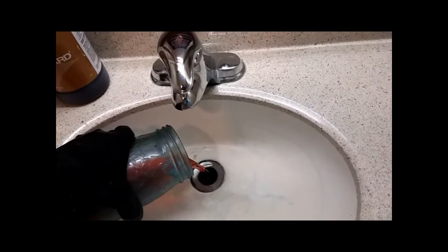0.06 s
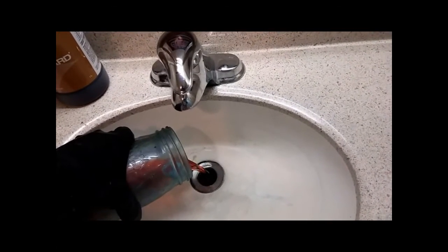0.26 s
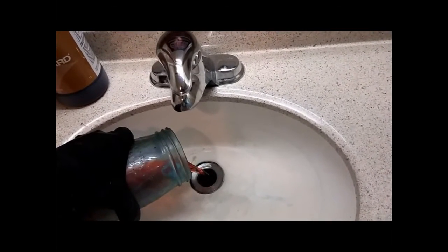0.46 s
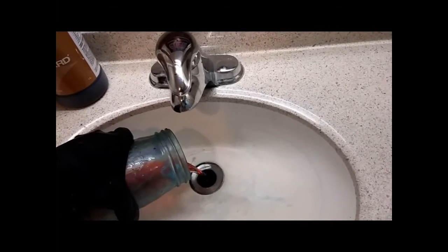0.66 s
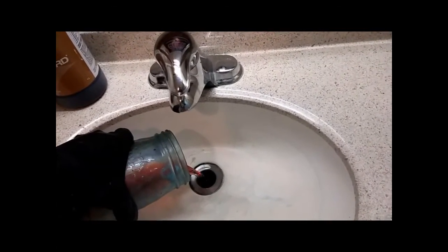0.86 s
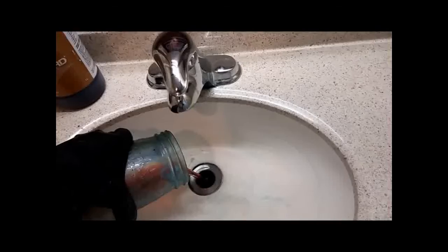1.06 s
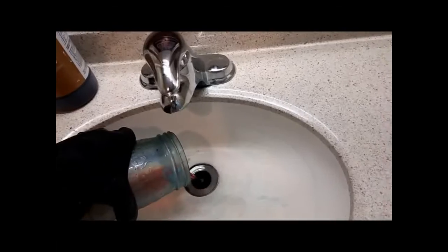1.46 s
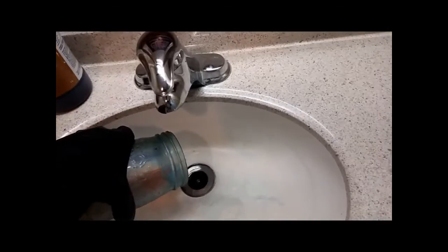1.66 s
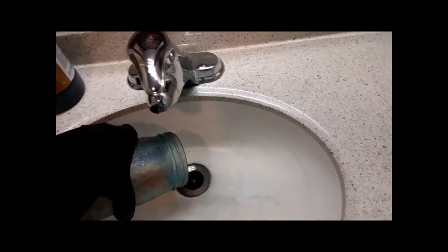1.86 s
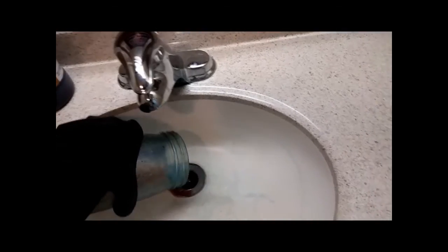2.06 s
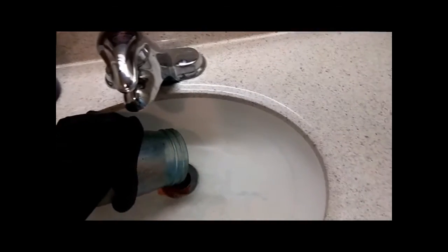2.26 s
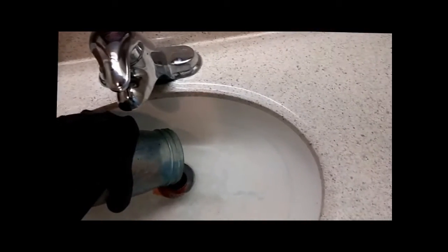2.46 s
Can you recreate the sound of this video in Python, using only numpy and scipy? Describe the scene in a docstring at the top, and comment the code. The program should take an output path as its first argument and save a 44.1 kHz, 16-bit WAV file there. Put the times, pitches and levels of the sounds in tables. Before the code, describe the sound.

Liquid poured from a jar splashes and glugs down a bathroom sink drain.

```python
"""Water splashes and glugs down a bathroom sink drain: a thin stream from a jar, in uneven surges.
Air pockets glug in the waste pipe, splashes ring the throat above the trap, small bubbles chirp
and spray ticks. Foam fizzes as the pour ends. Heard from just above, with reflections from the
basin and the small room, over a quiet hush."""
import sys
import numpy as np
from scipy import signal
from scipy.fft import rfft, irfft
from scipy.io import wavfile

SR = 44100
rng = np.random.default_rng(int(sys.argv[2]) if len(sys.argv) > 2 else 0)


def unload_audio(sound):
    """Save the sound as a 16-bit wav file, at the path given as the first command line argument."""
    columns = np.transpose(np.atleast_2d(sound))
    # keep every value between -1 and 1, then stretch to whole-number steps
    steps = np.round(np.clip(columns, -1, 1) * 32767)
    wavfile.write(sys.argv[1], SR, steps.astype(np.int16))


N = 114660

# surges of the stream: start_s, length_s, rumble_db, throat_db, bubble_db, spray_db, bubble_hz
STREAM_SURGES = [(0.189, 0.047, -39.5, -44.5, -46, -48.5, 2470), (0.254, 0.058, -48, -57.5, -48, -54, 2620),
                 (0.443, 0.12, -39.5, -43.5, -37.5, -44, 2530), (0.571, 0.12, -61, -55, -49.5, -53.5, 2575),
                 (0.7, 0.096, -37.5, -37.5, -37, -41, 2755), (0.803, 0.16, -35, -39, -39.5, -43, 2477),
                 (.96, 0.093, -41, -42.5, -37, -48.5, 2510), (1.062, 0.024, -63, -50.5, -44, -47.5, 2310),
                 (1.198, 0.08, -77, -54, -68, -48, 2310), (1.367, 0.055, -48, -55, -49, -45.5, 2880),
                 (1.434, 0.041, -40.5, -42.5, -33.5, -40, 2850), (1.548, 0.12, -39, -40, -39, -40.5, 2954),
                 (1.665, 0.044, -43.5, -46.5, -42, -46.5, 2870), (1.932, 0.04, -76, -53, -55, -54, 2860),
                 (1.989, 0.053, -42.5, -48, -36.5, -46.5, 3105)]
# single drops landing: start_s, bubble_db, bubble_hz, throat_db, spray_db
SINGLE_DROPS = [(0.0593, -64, 2480, -39, -44), (0.1767, -33.5, 2240, -34, -47),
                (0.2029, -36, 2160, -31, -59), (0.2327, -26, 2440, -54, -33),
                (0.2744, -42, 2370, -36, -39.5), (0.4461, -27.5, 2620, -62, -54),
                (0.4697, -27, 2560, -44, -56), (0.484, -28, 2300, -33, -54),
                (0.5299, -26, 2600, -31, -34.5), (0.5524, -54, 2350, -26.5, -40),
                (0.6245, -50, 2580, -49, -37.5), (0.7014, -30, 2220, -29.5, -48),
                (0.7357, -22.5, 2672, -35, -49), (0.7677, -31, 2510, -20.5, -50),
                (0.8345, -45, 2230, -37, -35), (0.857, -35.5, 2330, -34, -56),
                (0.8844, -36, 3100, -36, -34), (0.9203, -20, 2346, -17, -52),
                (0.9374, -26.5, 2230, -34, -61), (0.9837, -34, 2400, -29.5, -41),
                (1.0129, -21.5, 2433, -52, -55), (1.0365, -34, 2600, -26, -36),
                (1.0734, -54, 2300, -60, -47), (1.2002, -69, 2900, -58, -40), (1.2234, -50, 2780, -47, -53),
                (1.373, -44, 2970, -68, -34.5), (1.3922, -43, 2410, -31, -52),
                (1.4394, -28, 2980, -25, -29), (1.4825, -33, 2960, -26.5, -39),
                (1.509, -39, 2830, -31, -32), (1.5475, -23, 2800, -26.5, -36),
                (1.5761, -24, 2846, -46, -30.5), (1.598, -26, 2800, -27.5, -44),
                (1.6149, -22, 3000, -26, -23.5), (1.6536, -39, 2620, -60, -34),
                (1.7214, -50, 3040, -61, -35.5), (1.7484, -45, 2970, -39.5, -48),
                (1.947, -41, 2890, -35.5, -62), (2.002, -36, 2870, -42, -39),
                (2.0463, -40, 2880, -26.5, -38), (2.2814, -54, 2630, -66, -42)]

BUBBLE_RISE, SIZE_SPREAD_DB, DROP_ATTACK_S = 0.058, 2.5, 0.001186
SPRAY_PER_S, SPRAY_SPREAD_DB = 1500, 1.5
WIDE_ABOVE_HZ = 498


def stream():
    """Gains of rumble, throat ring and spray over time; the surges add in power."""
    attack_s, release_s = 0.0046, 0.0066
    power = np.zeros((3, N))
    for start_s, length_s, rumble_db, throat_db, _, spray_db, _ in STREAM_SURGES:
        t = np.arange(N) / SR - start_s
        envelope = np.clip(t / attack_s, 0, 1) * np.exp(-np.maximum(t - length_s, 0) / release_s)
        power += np.outer(undb([rumble_db, throat_db, spray_db]), envelope) ** 2
    return np.sqrt(power)


def pipe(drive):
    """Stream and draining water shake the waste pipe's air column; big air pockets glug into it."""
    # air column modes: pitch_hz
    modes_hz = [84, 120, 164, 221, 251, 200, 290, 326, 350, 398, 465]
    # ring of each mode: t60_s, level_db
    mode_rings = [(0.32, -16.5), (0.26, -7.5), (0.2, 0), (0.26, -6), (0.1, -5.5), (.04, 3.5),
                  (0.018, -17.5), (0.089, -4.5), (0.053, -3.5), (0.54, -11.5), (0.15, -12.5)]
    # air pockets: start_s, level_db, pitch_hz
    pockets = [(0.208, -43, 190), (0.238, -35, 275), (0.337, -34.5, 208), (0.375, -39, 338),
               (0.445, -32.5, 230), (.468, -32, 283), (0.487, -27.5, 181), (.517, -29.5, 226),
               (0.584, -35, 218), (0.702, -27, 320), (0.726, -27, 290), (0.756, -28, 303),
               (.781, -26.5, 270), (.815, -37, 245), (0.854, -20.5, 212), (0.918, -20.5, 191),
               (0.983, -29.5, 152), (1.008, -30.5, 232), (1.39, -40, 298), (1.447, -34, 172),
               (1.466, -37.5, 129), (1.554, -25.5, 162), (1.624, -26.5, 208), (1.651, -27.5, 199),
               (1.693, -48, 210), (2.009, -28.5, 189), (2.235, -39.5, 160), (2.323, -35, 165),
               (2.391, -62, 167), (2.484, -38.5, 168), (2.562, -41, 165)]
    drain_db, resonance_db = -46.5, -1
    column = ring([(hz, t60_s, db) for hz, (t60_s, db) in zip(modes_hz, mode_rings)])
    glugs = np.zeros(N)
    for start_s, db, hz in pockets:
        add(glugs, start_s, undb(db + 9.5) * bubble(hz, cycles=9.45, rise=0.093))
    impacts = patter(per_s=420, spread_db=1.65) * (drive + undb(drain_db))
    rumble = lowpass(through(impacts, column), hz=421, order=5)
    return rumble + glugs + undb(resonance_db) * through(glugs, unit_peak_gain(column))


def throat(drive):
    """Splashes, a trickle and single drops ring the short tube above the trap."""
    # tube modes: pitch_hz, t60_s, level_db
    modes = [(691, 0.1, -8), (700, 0.019, -30), (749, 0.041, 4), (776, 0.092, -12.5), (970, 0.0089, -11),
             (1365.6, 0.069, 1.5), (1364, 0.027, -4), (1680, 0.055, -9), (1775, 0.043, -17),
             (2235, 0.016, 9)]
    # trickle: time_s, level_db
    trickle = [(0, -62), (.35, -57.5), (.42, -58), (.65, -48), (1.15, -57.5), (1.75, -53.5), (1.87, -67.5),
               (2.14, -62.5), (2.25, -65), (2.6, -72)]
    tube = unit_energy(highpass(lowpass(ring(modes), hz=2100), hz=527, order=4))
    blows = np.zeros(N)
    for start_s, _, _, db, _ in SINGLE_DROPS:
        add(blows, start_s + DROP_ATTACK_S, np.array([undb(db - 2) / np.abs(tube).max()]))
    splashes = patter(per_s=260, spread_db=SIZE_SPREAD_DB) * np.hypot(drive, curve(trickle))
    return through(blows + splashes, tube)


def bubbles():
    """Each surge traps a swarm of small bubbles, each drop one; they chirp in the drain's mouth."""
    # cross modes of the mouth: pitch_hz, t60_s, level_db
    modes = [(2194, 0.16, -2), (2311, 0.076, 8), (2340, 0.096, -7), (2509, 0.057, 1.5), (2750, 0.076, 3),
             (2910, 0.12, -5), (3003, 0.18, -10)]
    per_s, cycles, pitch_scatter = 220, 50, 0.128
    direct_db, mouth_db = -9.5, 5
    chirps = np.zeros((2, N))
    for start_s, length_s, _, _, db, _, hz in STREAM_SURGES:
        swarm = np.zeros((2, N))
        for when, pitch, size, life, side in rng.random((128, 5))[:int(per_s * length_s) + 1]:
            pitch_hz = hz * np.exp(pitch_scatter * (2 * pitch - 1))
            chirp = bubble(pitch_hz, cycles * (0.5 + life), BUBBLE_RISE)
            gain = undb(-SIZE_SPREAD_DB * np.log(1 - size))
            add(swarm, start_s + when * length_s, pan(gain * chirp, 2 * side - 1))
        chirps += undb(db) * swarm * np.sqrt(2 * length_s * SR / np.sum(swarm ** 2))
    for start_s, db, hz, _, _ in SINGLE_DROPS:
        add(chirps, start_s, undb(db + 8) * bubble(hz, cycles, BUBBLE_RISE))
    mouth = unit_peak_gain(ring(modes))
    return np.array([undb(direct_db) * x + undb(mouth_db) * through(x, mouth) for x in chirps])


def plinks():
    """Lone bubbles ring on, rising slightly in pitch."""
    # bubbles: start_s, level_db, pitch_hz, cycles
    lone_bubbles = [(.007, -43.5, 1580, 140), (.903, -26, 792, 55), (.922, -25, 3670, 74),
                    (1.215, -48, 1717, 260), (1.262, -38, 2240, 140), (2.125, -43.5, 773, 140),
                    (2.236, -45.5, 760, 48), (2.455, -48, 770, 59)]
    out = np.zeros(N)
    for start_s, db, hz, cycles in lone_bubbles:
        add(out, start_s, undb(db) * bubble(hz, cycles, rise=0.07))
    return out


def spray(drive):
    """Fine droplets spatter on the drain; each drop throws a short burst of them."""
    # spatter between surges: time_s, level_db
    spatter = [(0, -64.5), (.33, -59), (.41, -58.5), (.65, -51), (1.05, -58), (1.12, -63), (1.18, -58.5),
               (1.33, -53), (1.75, -54), (1.86, -65.5), (2.1, -59), (2.6, -64)]
    # tick spectrum: freq_hz, level_db
    spectrum = [(900, -19.5), (1900, -13.5), (2600, 1), (3200, -3), (3550, -9), (3900, -1.5), (4500, -1.5),
                (5050, 3.5), (5850, -0.5), (6700, -13), (9500, -9.5), (12500, -14.5)]
    burst_decay_s = 0.0036
    shower = undb(-4) * droplets() + undb(-8) * patter(SPRAY_PER_S, SPRAY_SPREAD_DB)
    ticks = shower * np.hypot(drive, curve(spatter))
    t = np.arange(SR // 40) / SR
    burst = (1 - np.exp(-t / DROP_ATTACK_S)) * np.exp(-t / burst_decay_s)
    for start_s, _, _, _, db in SINGLE_DROPS:
        add(ticks, start_s, undb(db + 4) * burst * rng.standard_normal((2, len(t))))
    return np.array([through(x, unit_energy(colour(spectrum))) for x in ticks])


def droplets():
    """Steady shower of tiny bubbles, the higher ones louder; stereo, rms 1."""
    low_hz, high_hz = 2820, 12350
    out = np.zeros((2, N))
    for when, pitch, size, side in rng.random((8000, 4))[:int(SPRAY_PER_S * N / SR)]:
        ratio = (high_hz / low_hz) ** pitch
        chirp = bubble(low_hz * ratio, cycles=20.3, rise=BUBBLE_RISE)
        gain = undb(SPRAY_SPREAD_DB * min(-np.log(1 - size), 4)) * ratio
        add(out, when * N / SR, pan(gain * chirp, 2 * side - 1))
    return unit_rms(out)


def foam():
    """Tiny bubbles burst, louder as the froth rises."""
    # fizz: time_s, level_db
    fizz = [(0, -95), (1.85, -74), (2.1, -64.5), (2.3, -57.5), (2.6, -55.5)]
    # pop spectrum: freq_hz, level_db
    spectrum = [(1000, -11), (2000, 6), (4000, -13), (5500, 8.5), (7000, 10), (9000, 10.5), (12500, 4)]
    pops = [patter(per_s=2400, spread_db=3) * curve(fizz) for _ in range(2)]
    return np.array([through(x, unit_energy(colour(spectrum))) for x in pops])


def bathroom(splash, tubes):
    """One channel: the basin reflects the splash, the tubes sound straight up, the room adds a tail."""
    basin_db, room_db = -1.5, -16.5
    basin = highpass(reflections(t60_s=0.033, onset_s=0.0006), WIDE_ABOVE_HZ)
    room = reflections(t60_s=0.35, onset_s=0.008)
    direct = splash + tubes
    reflected = undb(basin_db) * through(splash, basin) + undb(room_db) * through(direct, room)
    return undb(-4) * (direct + reflected)


def hush():
    """Quiet room air, alike on both sides in the bass."""
    # air spectrum: freq_hz, level_db
    spectrum = [(20, -12), (45, -8), (110, 17), (400, -1), (600, 0.5), (1000, -0.5), (2000, -15.5),
                (4000, -14), (5300, -37), (7000, -21), (10000, -11.5), (12500, -16)]
    response = undb(-59.5) * unit_energy(colour(spectrum))
    mid, side = (through(rng.standard_normal(N), response) for _ in range(2))
    side = highpass(side, WIDE_ABOVE_HZ) + 0.065 * side
    return np.array([mid + side, mid - side])


def bubble(hz, cycles, rise):
    """Sine that decays 60 dB over `cycles`; pitch climbs by the fraction `rise` toward the surface."""
    life_s = cycles / hz
    t = np.arange(int(life_s * SR)) / SR
    phase = 2 * np.pi * hz * t * (1 + rise * t / life_s / 2)
    onset = 1 - np.exp(-0.89 * hz * t)
    return np.sin(phase) * fade(t, life_s) * onset


def patter(per_s, spread_db):
    """Random impacts of uneven size, rms 1."""
    chance, size, sign = rng.random(N), rng.exponential(size=N), rng.choice([-1, 1], N)
    return unit_rms((chance < per_s / SR) * undb(spread_db * np.minimum(size, 4)) * sign)


def ring(modes):
    """Impulse response of damped modes."""
    t = np.arange(SR // 3) / SR
    partials = (undb(db) * fade(t, t60_s) * np.cos(2 * np.pi * hz * t) for hz, t60_s, db in modes)
    return unit_energy(sum(partials))


def reflections(t60_s, onset_s):
    """Diffuse echoes as decaying noise."""
    t = np.arange(SR // 2) / SR
    return unit_energy(rng.standard_normal(len(t)) * fade(t, t60_s) * (1 - np.exp(-t / onset_s)))


def pan(sound, side, lag_s=0.0002, far_db=-2):
    """Place at side -1 (left) to 1 (right): later and quieter in the far channel."""
    lag, near = int(abs(side) * lag_s * SR), int(side > 0)
    pair = np.zeros((2, len(sound) + lag))
    pair[near, :len(sound)] = sound
    pair[1 - near, lag:] = sound * undb(far_db * abs(side))
    return pair


def colour(points, size=1024):
    """Minimum-phase response from (freq_hz, level_db) points."""
    hz, db = np.array(points).T
    bins_hz = np.arange(size // 2 + 1) * SR / size
    gain = undb(np.interp(np.log(bins_hz + 1), np.log(hz), db))
    cepstrum = irfft(np.log(gain))
    cepstrum[1:size // 2] *= 2
    cepstrum[size // 2 + 1:] = 0
    return irfft(np.exp(rfft(cepstrum)))


def curve(points):
    """Gain over time from (time_s, level_db) points."""
    return undb(np.interp(np.arange(N) / SR, *np.array(points).T))


def add(out, start_s, sound):
    i = int(np.clip(start_s * SR, 0, N - 1))
    out[..., i:i + sound.shape[-1]] += sound[..., :N - i]


def through(x, response):
    return signal.fftconvolve(x, response)[:N]


def lowpass(x, hz, order=2):
    return signal.sosfilt(signal.butter(order, hz, fs=SR, output="sos"), x)


def highpass(x, hz, order=2):
    return signal.sosfilt(signal.butter(order, hz, "high", fs=SR, output="sos"), x)


def fade(t, t60_s):
    return np.exp(-np.log(1000) * t / t60_s)


def undb(db):
    return 10 ** (np.asarray(db) / 20)


def unit_rms(x):
    return x / np.sqrt(np.mean(x ** 2))


def unit_energy(response):
    return response / np.sqrt(np.sum(response ** 2))


def unit_peak_gain(response):
    return response / np.abs(rfft(response)).max()


def scene():
    """The drain from above, with foam and room air; stereo."""
    # left channel relative to right: freq_hz, gain_db
    left_eq = [(60, 1), (300, -.5), (640, 1.5), (1300, -.5), (1750, -7), (2300, -11.5), (3000, -9),
               (5000, -7), (6800, -3), (9000, 0), (12500, -2)]
    rumble_drive, throat_drive, spray_drive = stream()
    tubes = pipe(rumble_drive) + undb(1) * throat(throat_drive) + plinks()
    splash_left, splash_right = bubbles() + spray(spray_drive)
    left = through(bathroom(splash_left, tubes), colour(left_eq))
    right = bathroom(splash_right, tubes)
    return np.array([left, right]) + foam() + hush()


def record(dry):
    """The phone thins the deep bass and cuts the top."""
    low_hz, top_hz = 30, 12300
    top_cut = signal.ellip(10, 0.2, 70, top_hz, fs=SR, output="sos")
    return signal.sosfilt(top_cut, highpass(dry, low_hz))


dry = scene()
out = record(dry)
unload_audio(out)
```